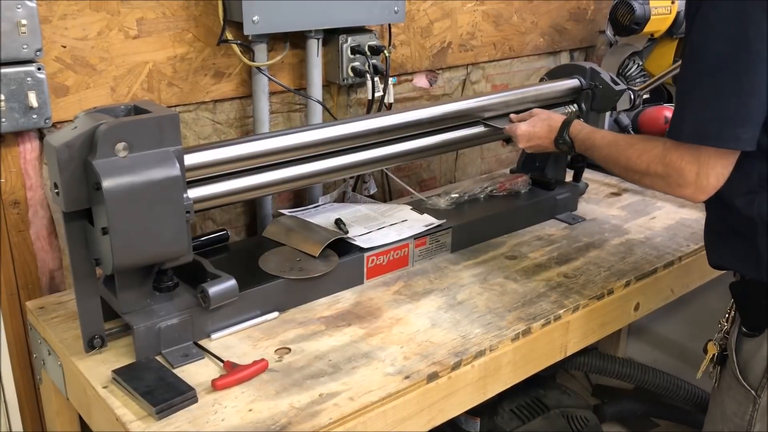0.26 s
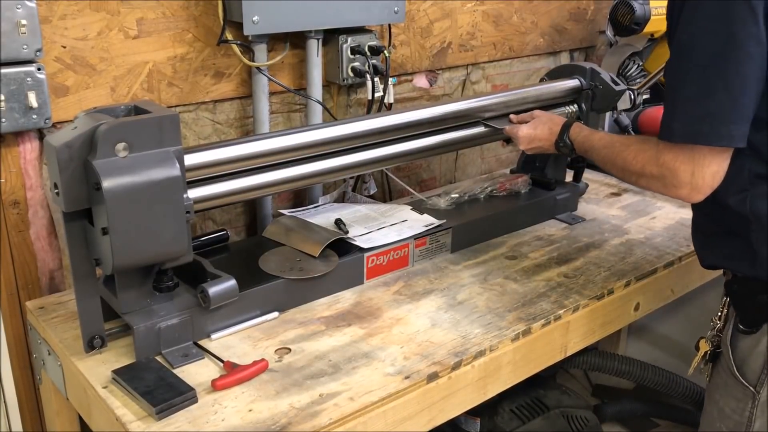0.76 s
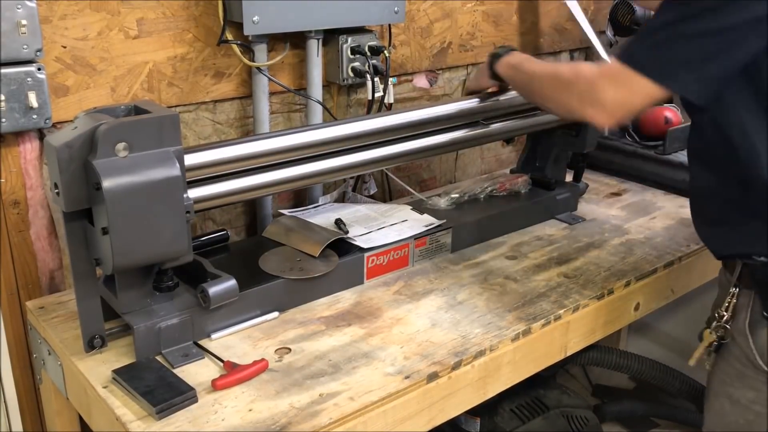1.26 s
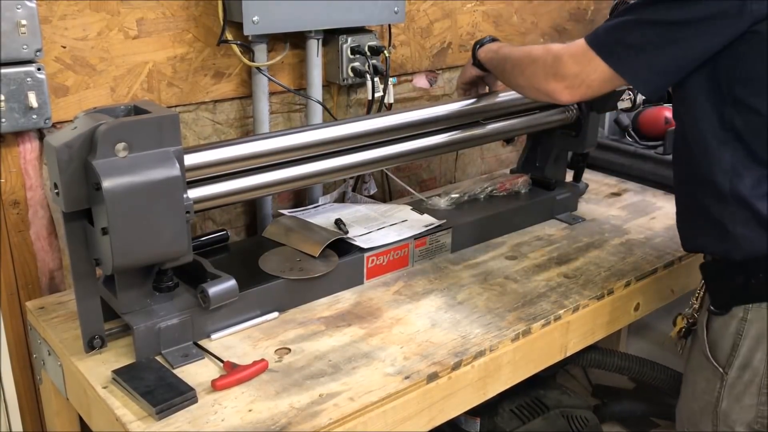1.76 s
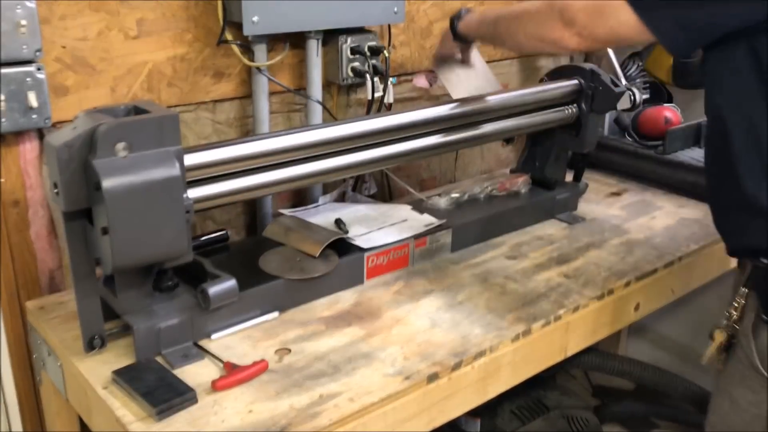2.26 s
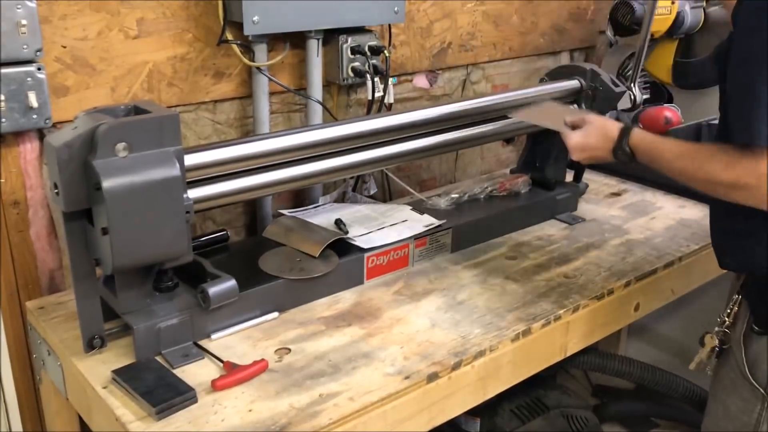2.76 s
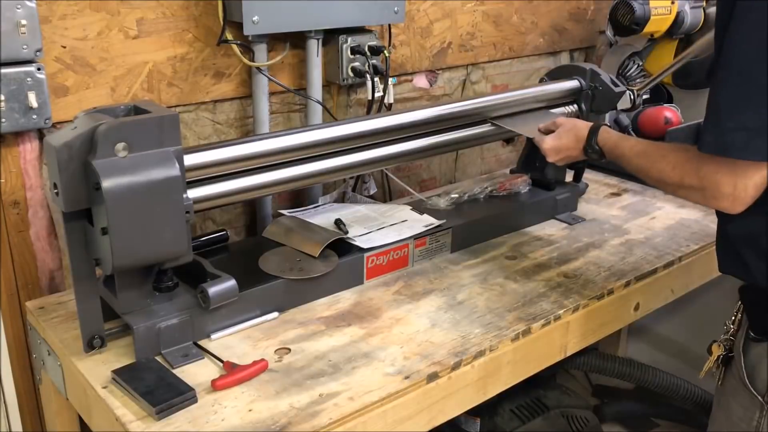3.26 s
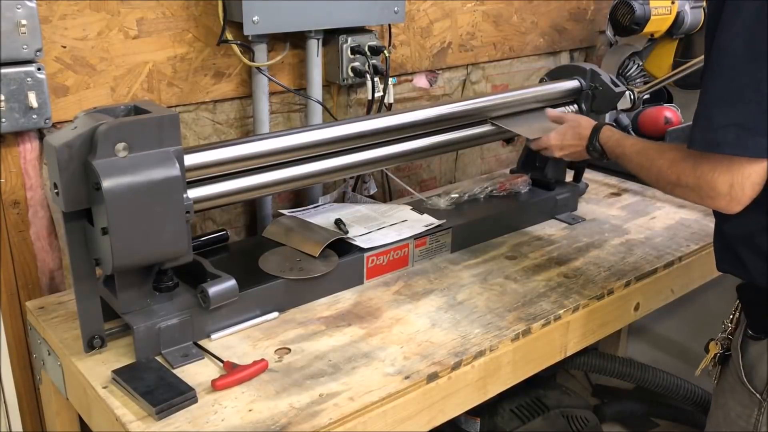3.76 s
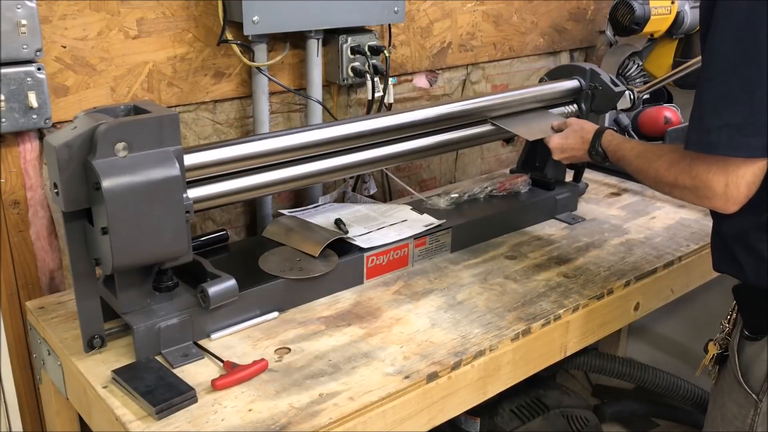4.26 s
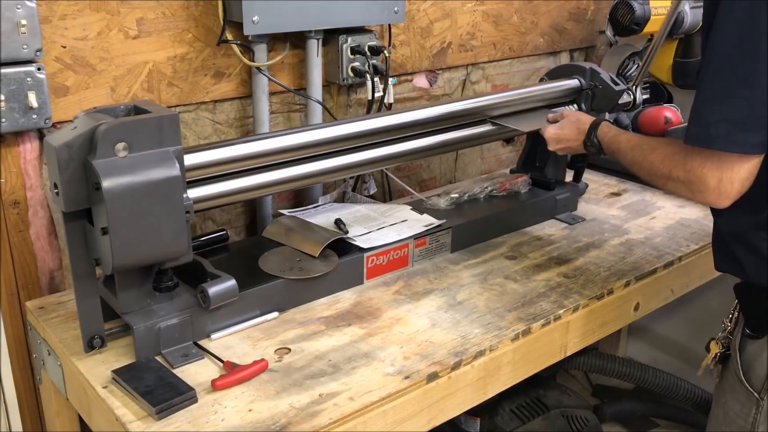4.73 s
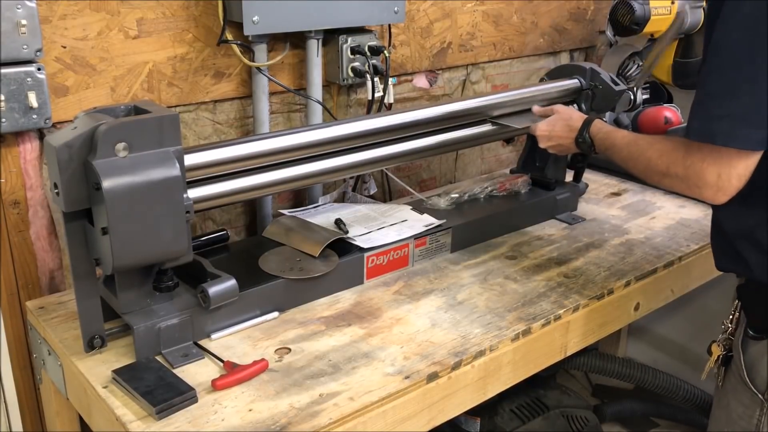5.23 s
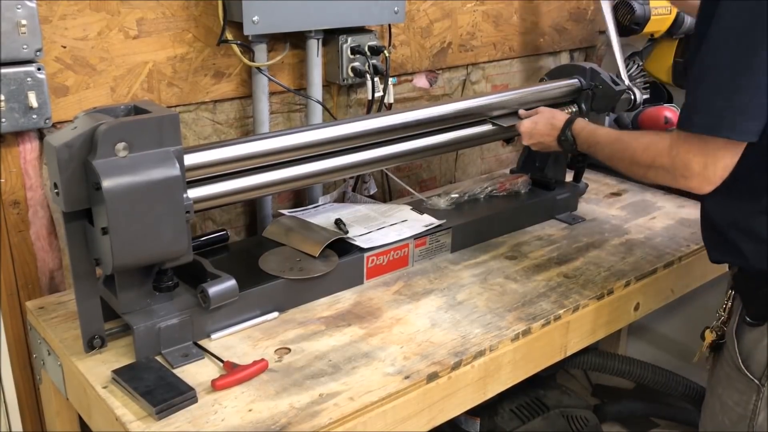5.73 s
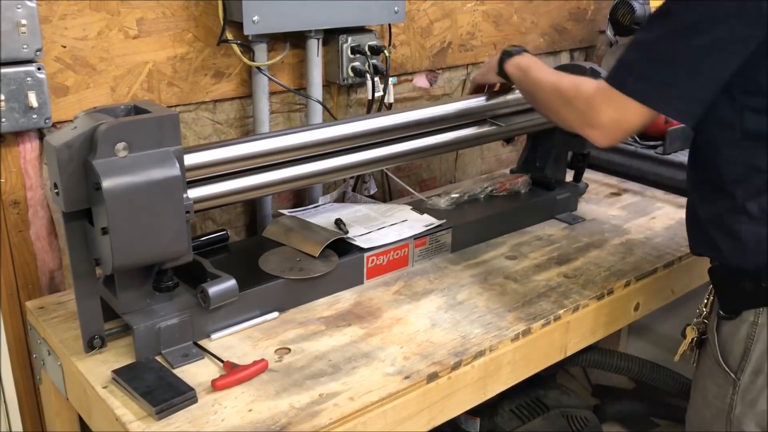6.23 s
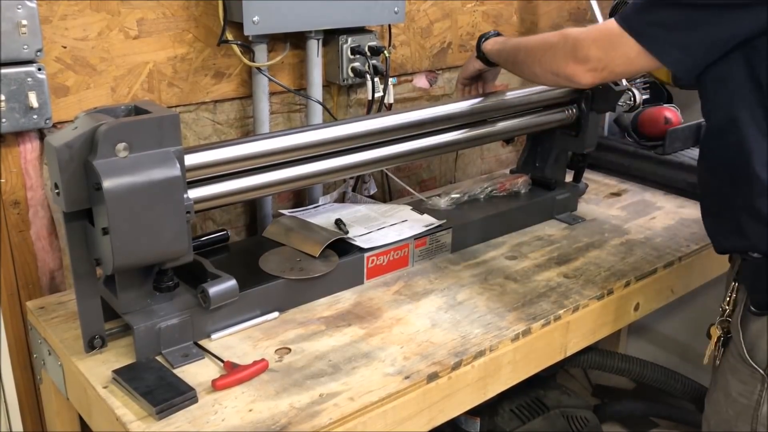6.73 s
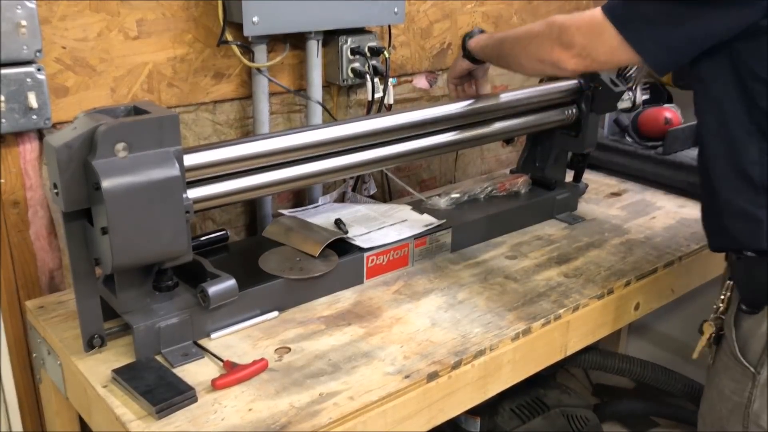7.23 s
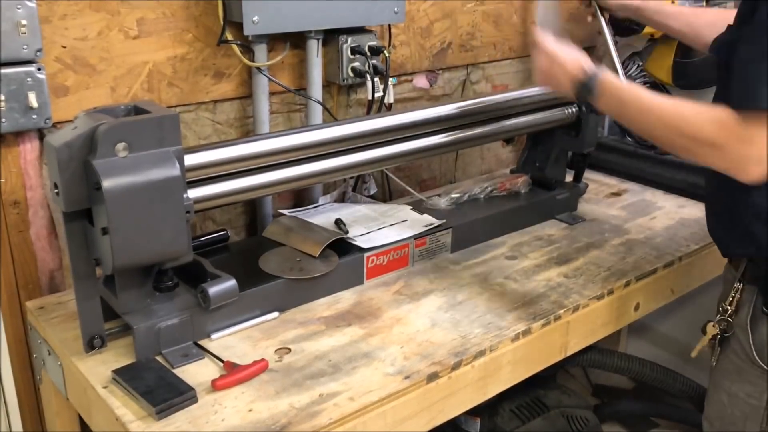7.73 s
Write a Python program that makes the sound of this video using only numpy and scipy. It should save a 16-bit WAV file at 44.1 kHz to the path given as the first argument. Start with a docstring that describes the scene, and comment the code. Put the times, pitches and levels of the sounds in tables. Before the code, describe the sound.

Mono, near a machine on a wooden bench in a short-tailed room. Almost quiet at first, then sliding sheet and a dozen rapid pawl clicks, a dull frame thud and a steel clank. Separate clicks slow down, with thin metallic ringing and sheet taps. Later three brisk click runs come with rumbling rolls, gritty rubbing and bumps, closing on another clunk-clank and a fading soft slide.

```python
"""A small workshop: sheet metal is fed through a hand-cranked slip roll on a wooden workbench.
Ratchet clicks are noise contacts ringing wheel modes; the turning rolls are swelling rumble and grinding noise.
Twice a roll drops with a clunk of the frame and a clank of steel. The sheet slides as combed noise, scrapes in
gliding bands, taps, bumps through a dispersive filter and sings on as decaying sines.
Keys on a belt tinkle in high modes; contacts carry a short room tail over noisy air, a faint hum and a whine."""
import sys
import numpy as np
from scipy import signal
from scipy.fft import rfft, irfft, next_fast_len
from scipy.io import wavfile
from scipy.ndimage import uniform_filter1d

SR = 44100
rng = np.random.default_rng(int(sys.argv[2]) if len(sys.argv) > 2 else 0)


def int16_out(signal):
    """Quantize to a 16-bit WAV file."""
    q = np.round(np.clip(np.atleast_2d(signal).T, -1, 1) * 32767)
    wavfile.write(sys.argv[1], SR, q.astype(np.int16))


N = 352359
SIZE = 2 ** 14  # samples in one contact sound
AGE = np.arange(SIZE) / SR  # s since contact
TIME = np.arange(N) / SR  # s


def amp(db):
    """Decibels to gain."""
    return 10 ** (np.asarray(db) / 20)


def unit(x):
    """Scale to rms 1."""
    return x / np.sqrt(np.mean(x ** 2) + 1e-20)


def norm(x):
    """Scale to energy 1."""
    return x / np.sqrt(np.sum(x ** 2) + 1e-20)


def at_level(x, db, size=1024):
    """Scale a hit so that its first samples have the given rms level."""
    return amp(db) * x / np.sqrt(np.mean(x[:size] ** 2) + 1e-20)


def along(points, hz):
    """(Hz, value) points read on a log frequency axis."""
    f, v = np.transpose(points)
    return np.interp(np.log(hz + 1), np.log(f), v)


def fade(t, t60):
    """Exponential decay by 60 dB in t60 seconds."""
    return amp(-60 * t / np.maximum(t60, 1e-4))


def swell(start, peak, end, depth_db, curve=1.3):
    """Gain of a movement: rises to its peak and sinks again, gated to the movement and smoothed over 18 ms."""
    away = np.abs(np.interp(TIME, [start, peak, end], [1, 0, 1]))
    moving = (TIME > start) * (TIME < end)
    return uniform_filter1d(amp(-depth_db * away ** curve) * moving, size=800)


def add(track, s, sound):
    """Mix a sound into a track at a time."""
    start = max(round(s * SR), 0)
    track[start:start + len(sound)] += sound[:N - start]


def noise(spectrum, grit_db=0):
    """Coloured noise of rms 1; grit varies its level at random every few milliseconds."""
    grit = np.interp(TIME, np.linspace(0, TIME[-1], N // 100), rng.standard_normal(N // 100))
    white = rng.standard_normal(N) * amp(grit_db * grit)
    m = next_fast_len(N + SIZE)
    gain = amp(along(spectrum, np.fft.rfftfreq(m, 1 / SR)))
    return unit(irfft(rfft(white, m) * gain, m)[:N])


def coloured(x, spectrum):
    """A short sound through a causal minimum-phase filter with the given (Hz, dB) shape."""
    gain = amp(along(spectrum, np.fft.rfftfreq(2 * SIZE, 1 / SR)))
    cepstrum = irfft(np.log(gain))
    cepstrum[1:SIZE] *= 2
    cepstrum[SIZE + 1:] = 0
    return irfft(rfft(x, 2 * SIZE) * np.exp(rfft(cepstrum)))[:SIZE]


def voiced(x, edges_hz, levels_db, size=1024):
    """Filter a contact so that its attack energy is shared among registers by the given levels."""
    power = 2 * np.abs(rfft(x[:size]) / size) ** 2
    hz = np.fft.rfftfreq(size, 1 / SR)
    shape = []
    for lo, hi, db in zip(edges_hz, edges_hz[1:], levels_db):
        present_db = 10 * np.log10(power[(hz >= lo) & (hz < hi)].sum() + 1e-20)
        shape.append((np.sqrt(lo * hi), db - present_db))
    return coloured(x, shape)


def ring(modes, spread_db):
    """Free vibration of energy 1; the strength and pitch of each mode vary from contact to contact."""
    hz, db, t60 = np.transpose(modes)[:, :, None]
    strength, detune, start = rng.standard_normal((3, len(modes), 1))
    age = AGE[AGE < 1.3 * t60.max()]
    phase = 2 * np.pi * (hz * (1 + .002 * detune) * age + start)
    return norm(np.sum(amp(db + spread_db * strength) * fade(age, t60) * np.sin(phase), axis=0))


def blow(chatter_t60, chatter_db, room_db, rise=0.00046, contact_t60=0.023):
    """A short noise contact, its later-rising chatter, and the room's frequency-dependent tail (times in s)."""
    # workshop decay: (frequency [Hz], t60 [s])
    workshop = [(150, 0.37), (400, 0.16), (1000, 0.16), (3000, 0.22), (7000, 0.2), (15000, .15)]
    onset = 1 - np.exp(-AGE / rise)
    contact = rng.standard_normal(SIZE) * fade(AGE, contact_t60) * onset
    chatter = rng.standard_normal(SIZE) * fade(AGE, chatter_t60) * onset ** 4
    hz, t, z = signal.stft(rng.standard_normal(SIZE), SR, nperseg=256)
    decay = fade(t, along(workshop, hz)[:, None])
    tail = signal.istft(z * decay, SR, nperseg=256)[1][:SIZE]
    room = norm(tail * (1 - np.exp(-AGE / 0.0035)))
    return norm(contact) + amp(chatter_db) * norm(chatter) + amp(room_db) * room


def struck(push, modes, crack_db, spread_db=2):
    """A body's modes ring under a blow, which is also heard bare as a crack."""
    return signal.fftconvolve(push, ring(modes, spread_db))[:SIZE] + amp(crack_db) * push


def background():
    """Workshop air as steady coloured noise, with a low hum and a thin whine as sines."""
    # air spectrum: (frequency [Hz], relative density [dB])
    air = [(12, -46), (20, -24.5), (70, -6.5), (98, -9), (150, -10.5), (319, -22), (357, -17.5), (446, -23),
           (485, -25.5), (897, -25), (2020, -36.5), (3740, -36.5), (10500, -39.5), (14700, -35.5),
           (16000, -33.5)]
    # hum and whine: (frequency [Hz], rms level [dB])
    hum = [(70, -61), (15165, -79.5)]
    air_db = -57.5
    tones = sum(amp(db) * np.sqrt(2) * np.sin(2 * np.pi * hz * TIME) for hz, db in hum)
    return amp(air_db) * noise(air) + tones


def sliding(echo=0.13):
    """Gritty hiss of sheet and sleeve rubbing, combed by a reflection off the bench of swaying delay."""
    # slides: (start [s], firmest [s], end [s], level [dB])
    slides = [(.08, 0.19, 0.28, -63.5), (0.959, 1.013, 1.04, -57), (1.006, 1.07, 1.14, -50.5),
              (1.06, 1.3, 1.58, -51.5), (2.049, 2.217, 2.6, -53.5), (3.537, 3.68, 4.16, -61),
              (5.776, 5.808, 5.92, -55), (6.454, 6.593, 6.8, -50), (7.189, 7.223, 7.33, -57),
              (7.583, 7.64, 7.88, -61)]
    # hiss spectrum: (frequency [Hz], relative density [dB])
    spectrum = [(350, -45.5), (600, -15.5), (1180, -8), (1780, -6), (2720, -5), (3210, -2.5), (3680, -7.5),
                (4280, -7.5), (7110, -3.5), (14900, -15), (16000, -26)]
    pressure = sum(amp(db) * swell(start, peak, end, depth_db=12, curve=1.6)
                   for start, peak, end, db in slides)
    hiss = noise(spectrum, grit_db=2.5)
    delay_s = .00093 * (1 + 0.023 * np.sin(2 * np.pi * 1.6 * TIME))
    return pressure * unit(hiss + echo * np.interp(TIME - delay_s, TIME, hiss))


def knocks(skirt_db=30):
    """Damped taps of sheet and crank on the machine, each centred on its contact's own frequency band."""
    # taps: (time [s], attack level [dB], centre [Hz], width [octaves])
    taps = [(0.382, -63, 2200, 1.4), (2.07, -47.5, 1500, 2.4), (2.153, -35, 3770, 0.91),
            (2.234, -44.5, 2200, 4.3), (3.13, -35.5, 8850, 4.2), (3.18, -35.5, 9300, 5.5),
            (4.038, -37, 7900, 1.88), (4.073, -39.5, 7500, 0.82), (4.1, -42, 750, 1.4),
            (4.537, -44, 647, 1.12), (5.174, -36.5, 2600, 1.03), (5.767, -32.5, 2750, 1.56),
            (5.98, -35, 1780, 0.99), (6.558, -32.5, 3400, 1.1)]
    # hand-damped sheet modes: (frequency [Hz], level [dB], t60 [s])
    sheet = [(810, -2, .09), (1290, 0, .06), (1620, -5, .05), (3020, -2, .07), (3350, -3, .06),
             (4450, -4, .05)]
    out = np.zeros(N)
    shape = [(50, -16.0), (180, 3.5), (1300, -0.5), (3000, -6), (6000, -7.5), (16000, -14)]
    hz = np.geomspace(50, 16000, 24)
    for s, db, centre_hz, octaves in taps:
        push = blow(chatter_t60=.1, chatter_db=-3, room_db=-2, rise=.0007, contact_t60=.022)
        band = np.exp(-(np.log2(hz / centre_hz) / octaves) ** 2)
        contact_db = 10 * np.log10(band + amp(-2 * skirt_db))
        spectrum = np.transpose([hz, along(shape, hz) + contact_db])
        tap = coloured(struck(push, sheet, crack_db=12.5), spectrum)
        add(out, s, at_level(tap, db))
    return out


def keys():
    """Small keys touch and ring in high modes."""
    # touches: (time [s], attack level [dB])
    tinkles = [(.625, -59.5), (1.443, -40.5), (6.766, -44.5), (7.645, -60)]
    # key modes: (frequency [Hz], level [dB], t60 [s])
    modes = [(4600, -22, .5), (7350, -12, .12), (9180, -3, .15), (10950, 0, .2), (11880, -2, .22),
             (12650, -9, .22)]
    out = np.zeros(N)
    for s, db in tinkles:
        push = blow(chatter_t60=0.012, chatter_db=-16.0, room_db=-8.0)
        add(out, s, at_level(struck(push, modes, crack_db=-7.5), db))
    return out


def rolling():
    """The turning rolls shake the bench and grind over the sheet: two noises that swell with each turn."""
    # turns: (start [s], fastest [s], end [s], rumble level [dB], grinding level [dB])
    turns = [(0.996, 1.392, 1.84, -53, -55.5), (1.56, 1.83, 2.11, -42.5, -43.5),
             (2.019, 2.115, 2.36, -47.5, -50), (5.144, 5.348, 5.74, -36, -42),
             (5.922, 6.151, 6.58, -37, -38), (6.486, 6.715, 6.98, -50.5, -59),
             (6.769, 7.085, 7.57, -43.5, -45)]
    # rumble spectrum: (frequency [Hz], relative density [dB])
    rumble_spectrum = [(70, -25), (105, -10.5), (135, 4.5), (180, 5.5), (232, 4.5), (290, -14), (380, -8.5),
                       (600, -34)]
    # grinding spectrum: (frequency [Hz], relative density [dB])
    grind_spectrum = [(200, -20.5), (340, -4.5), (520, 0.5), (820, 0), (1100, -0.5), (1400, -1), (2500, -7),
                      (3600, -6.5), (5000, -11), (16000, -33)]
    rumble = sum(amp(db) * swell(start, peak, end, depth_db=21) for start, peak, end, db, _ in turns)
    grind = sum(amp(db) * swell(start, peak, end, depth_db=27) for start, peak, end, _, db in turns)
    return rumble * noise(rumble_spectrum) + grind * noise(grind_spectrum, grit_db=2.0)


def scrapes(width_hz=110):
    """Friction noise in one narrow resonance that glides down as the sheet slides."""
    # scrapes: (start [s], end [s], first frequency [Hz], last frequency [Hz], level [dB])
    glides = [(1.07, 1.248, 3300, 3100, -61.5), (1.106, 1.34, 4560, 4250, -58),
              (1.153, 1.441, 2390, 2240, -59.5), (5.778, 5.91, 4680, 4450, -56.5),
              (6.565, 6.778, 2450, 1580, -52.5)]
    out = np.zeros(N)
    lowpass = signal.butter(2, width_hz, fs=SR)
    for start, end, first_hz, last_hz, db in glides:
        hz = np.geomspace(first_hz, last_hz, round((end - start) * SR))
        flutter = unit(signal.lfilter(*lowpass, rng.standard_normal(len(hz))))
        envelope = np.sin(np.linspace(0, np.pi, len(hz)))
        carrier = np.sin(2 * np.pi * np.cumsum(hz) / SR)
        add(out, start, amp(db) * envelope * unit(flutter * carrier))
    return out


def bumps(lag_1khz_s=0.012):
    """Soft bumps as the sheet flexes: low bending waves travel slowest, so each sweeps downward."""
    # bumps: (time [s], attack level [dB], brightness [dB per octave])
    flexes = [(1.385, -48, 4.5), (2.075, -48.5, -1), (5.538, -52, -1), (5.642, -55, -1),
              (5.935, -53.5, 1.5), (6.39, -44.5, -1.5), (7.224, -41.5, 1.5)]
    out = np.zeros(N)
    shape = [(50, -27), (140, 0.5), (400, -6), (800, -9), (1800, -18), (4000, -32), (16000, -52)]
    dispersion = np.exp(-4j * np.pi * lag_1khz_s * np.sqrt(1000 * np.fft.rfftfreq(SIZE, 1 / SR)))
    for s, db, tilt_db in flexes:
        tilted = [(hz, level + tilt_db * np.log2(hz)) for hz, level in shape]
        push = coloured(blow(chatter_t60=0.039, chatter_db=9.5, room_db=1.0, rise=0.005), tilted)
        add(out, s, at_level(irfft(rfft(push) * dispersion), db, size=2048))
    return out


def singing():
    """Single modes of sheet or roll sing on as decaying sines."""
    # tones: (time [s], frequency [Hz], level [dB], t60 [s])
    tones = [(1.443, 4630, -57.5, 1), (1.937, 1220, -41, 0.24), (2.291, 4170, -39, 0.4),
             (2.599, 2280, -35.5, 0.76), (2.665, 1178, -32.5, 1), (2.797, 1192, -33.5, 1),
             (2.957, 1165, -25, 0.22), (4.1, 804, -32, 0.12), (4.173, 2930, -60, 0.88),
             (4.175, 4530, -41, 0.14), (4.174, 1036, -24, 0.07), (5.174, 832, -26.5, 0.099),
             (5.766, 1300, -31, 0.11), (7.087, 827, -39.5, 0.25), (7.389, 3600, -43.5, .55)]
    out, t = np.zeros(N), TIME[:SR]
    onset = 1 - np.exp(-t / 0.01)
    for s, hz, db, t60 in tones:
        add(out, s, amp(db) * fade(t, t60) * onset * np.sin(2 * np.pi * hz * t))
    return out


def tooth_times(first, last, teeth, slow_start, slow_end, braking):
    """The crank picks up speed, cruises and brakes: when the pawl passes each tooth."""
    pickup = .5  # share of the slow start left after each tooth
    k = np.arange(round(teeth) - 1)
    gaps = 1 + slow_start * pickup ** k + slow_end * braking ** k[::-1]
    return first + (last - first) * np.append(0, np.cumsum(gaps / gaps.sum()))


def click(knock_db, ring_db, seating, chatter_db):
    """The pawl snaps into one tooth; its seating weights the wheel's modes."""
    # wheel and pawl modes: (frequency [Hz], level [dB], t60 [s], gain per unit of seating [dB])
    wheel = [(690, -28, .05, -2), (834, -24, .08, 3), (1174, -22, .09, -4), (1510, -23, .05, 2),
             (1930, -25, .05, 0), (2295, -20, .08, 0), (3710, -7, .04, -4), (4170, -6, .04, 3),
             (4330, -9, .03, 3), (4540, -11, .03, 3), (5370, -4, .045, -2), (6370, -5, .03, -1),
             (6890, 1, .04, 0), (7400, -10, .04, 0), (8590, -3, .055, 4), (9665, -8, .06, -1),
             (11010, -9, .07, 4), (11320, -16, .06, -2), (11670, -5, .045, 0), (12010, -11, .08, 0),
             (13710, -8, .06, -1), (14420, -13, .08, 1), (15170, -6, .08, 0)]
    # edges of the knock and the three ring registers: frequency [Hz]
    bands_hz = [500, 2800, 4900, 8000, 16000]
    # low, middle and high ring: gain per unit of seating [dB]
    ring_seating_db = [1.16, 0.2, 2]
    shape = [(60, -22.5), (170, -7.0), (450, -2), (800, 1.5), (1200, 5.5),
             (2000, 3), (3200, 5), (7000, -0.5), (10000, -2), (16000, -4.0)]
    modes = [(hz, db + seating * gained_db, t60) for hz, db, t60, gained_db in wheel]
    push = blow(chatter_t60=.065, chatter_db=chatter_db, room_db=-2.5, rise=.0018, contact_t60=.012)
    sound = coloured(struck(push, modes, crack_db=-10, spread_db=3), shape)
    return voiced(sound, bands_hz, [knock_db, *(ring_db + seating * np.array(ring_seating_db))])


def nudge(pause):
    """A step of the crank sways the bench, less if the next follows within 55 ms."""
    # wooden bench top modes: (frequency [Hz], level [dB])
    bench = [(140, -6), (178, 2.5), (228, -2)]
    sway = fade(AGE, 0.093) * (1 - np.exp(-AGE / 0.016)) ** 2
    boards = sum(amp(db) * np.sin(2 * np.pi * (hz * AGE + rng.random())) for hz, db in bench)
    return min(pause / 0.055, 1) ** 2 * sway * boards


def ratchet():
    """Crank strokes as runs of pawl clicks, whose ring, rattle and treble follow the bite and progress of the pull."""
    # strokes: (first click [s], last click [s], teeth [count], extra first gap [share],
    # extra last gap [share], braking left one tooth earlier [share])
    strokes = [(1.596, 1.937, 12, .48, .19, .1), (2.599, 3.078, 7, .3, 1.41, .576),
               (3.197, 3.394, 3, 0, .03, 0), (4.173, 4.173, 1, 0, 0, 0), (5.245, 5.468, 8, .46, .76, .26),
               (6.037, 6.335, 11, .16, .92, .2), (6.885, 7.152, 10, .4, .38, .486)]
    # efforts of the same strokes: (knock level [dB], ring level [dB], extra ring at the bite [dB],
    # treble loss [dB], pawl seating [0 = middle], bench sway [dB])
    efforts = [(-37, -27, 3, 6, .6, -29), (-37.5, -26.5, 3.5, 0.5, -0.57, -21.5),
               (-35, -27, 0, 0, 0.34, -24.5), (-36.5, -31, -1.5, 0, 1.5, -30),
               (-31.5, -28.5, 0, 9, -.4, -24), (-33, -28, 1.5, 3, -1.7, -28), (-36, -28, 0, 11, 1.3, -26.5)]
    # low, middle and high ring: level [dB]
    register_db = [-2.5, .5, -2]
    # low, middle and high ring: treble loss taken [share]
    dulling_share = [-.2, 1, 1]
    bite_tooth, bite_teeth = 1.6, 1.1  # teeth after the first, width in teeth
    seating_drift, seating_scatter = 0.28, .3  # rise over a stroke, chance per tooth
    swing_db, click_scatter_db = 2.5, 1.3  # stronger knock in mid-swing, chance per tooth
    chatter_db, chatter_swing_db = -8, 6  # rattle after a click, more in mid-swing
    out = np.zeros(N)
    for stroke, (knock_db, ring_db, bite_db, loss_db, seating, sway_db) in zip(strokes, efforts):
        times = tooth_times(*stroke)
        teeth = np.arange(len(times))
        pauses = np.diff(times, append=TIME[-1])
        progress = (teeth + .5) / len(times)
        swings = np.sin(np.pi * progress) ** 2 * (len(times) > 1)
        bites = np.exp(-((teeth - bite_tooth) / bite_teeth) ** 2)
        for s, pause, position, swing, bite in zip(times, pauses, progress, swings, bites):
            dulling_db = loss_db * (position ** 2 - np.mean(progress ** 2)) * np.array(dulling_share)
            scatter_db = click_scatter_db * rng.standard_normal(len(register_db))
            colour_db = register_db - dulling_db + scatter_db
            seat = seating + seating_drift * (position - .5) + seating_scatter * rng.standard_normal()
            sound = click(knock_db + swing_db * (swing - swings.mean()),
                          ring_db + bite_db * bite + colour_db, seat,
                          chatter_db + chatter_swing_db * swing * (1 - bite))
            add(out, s, sound + amp(sway_db) * nudge(pause))
    return out


def rolls_closing():
    """The sheet's end leaves the gap: the roll drops on the frame, then steel clanks on steel."""
    # roll on frame: (time [s], gain [dB])
    clunks = [(2.2617, -11), (7.358, -13.5)]
    # cast frame modes: (frequency [Hz], level [dB], t60 [s])
    frame = [(80, -14, .12), (183, -10, .09), (452, -10, .06), (684, 0, .07), (1090, -10, .08),
             (1345, -9, .06), (1630, -8, .03), (2560, -11, .05)]
    # clunk colour: (frequency [Hz], gain [dB])
    thud = [(35, -26), (75, 2.5), (150, -7.5), (240, -5), (400, -1.5), (520, -3), (670, -2), (850, 3),
            (1100, -0.5), (1500, -6.5), (2400, -3.5), (3500, -14.5), (7000, -25), (13000, -27),
            (16000, -34.5)]
    # edges of the clunk's registers: frequency [Hz]
    clunk_bands_hz = [60, 250, 550, 800, 3000, 16000]
    # five clunk registers, boom to crack: level [dB]
    clunk_db = [-19.5, -10, -7, -5.5, -17]
    # steel on steel: (time [s], gain [dB])
    clanks = [(2.291, -14), (7.389, -14)]
    # steel roll modes: (frequency [Hz], level [dB], t60 [s])
    steel = [(940, -8, .11), (1332, -3, .13), (2034, -5, .1), (3450, -9, .1), (4100, -7, .12),
             (5550, -4, .09), (6350, -3, .09), (7150, -7, .08), (8750, -2, .08)]
    # edges of the clank's registers: frequency [Hz]
    clank_bands_hz = [800, 2500, 5000, 10000, 16000]
    # four clank registers, ring to sizzle: level [dB]
    clank_db = [-10, -8, -2, -8]
    out = np.zeros(N)
    clash = [(80, -20), (250, -9.5), (600, -8.5), (1200, 1.0), (2700, -6.5), (8700, 2), (16000, -3.5)]
    for s, db in clunks:
        push = blow(chatter_t60=0.13, chatter_db=3.5, room_db=0, rise=0.00074, contact_t60=0.018)
        clunk = coloured(struck(push, frame, crack_db=9.5), thud)
        add(out, s, amp(db) * voiced(clunk, clunk_bands_hz, clunk_db))
    for s, db in clanks:
        push = blow(chatter_t60=.07, chatter_db=2.5, room_db=6, rise=.0016, contact_t60=.016)
        clank = coloured(struck(push, steel, crack_db=10), clash)
        add(out, s, amp(db) * voiced(clank, clank_bands_hz, clank_db))
    return out


def scene():
    """Sum all sources into one channel."""
    sheet = sliding() + knocks() + scrapes() + bumps() + singing()
    machine = rolling() + ratchet() + rolls_closing()
    return (background() + sheet + keys() + machine)[None]


def record(dry):
    """Round off the highest peaks softly, then cut everything above the band limit."""
    top_hz = 15900
    rounded = dry / (1 + np.abs(dry / .85) ** 4) ** (1 / 4)
    m = next_fast_len(N + SIZE)
    passed = np.fft.rfftfreq(m, 1 / SR) < top_hz
    return irfft(rfft(rounded, m) * passed, m)[..., :N]


dry = scene()
out = record(dry)
int16_out(out)
```